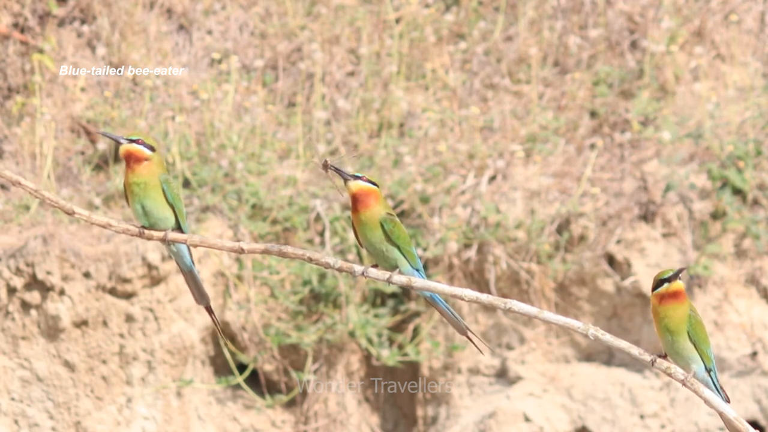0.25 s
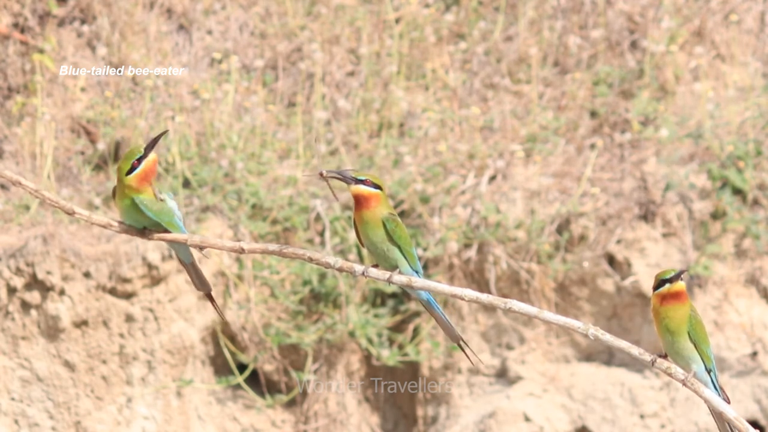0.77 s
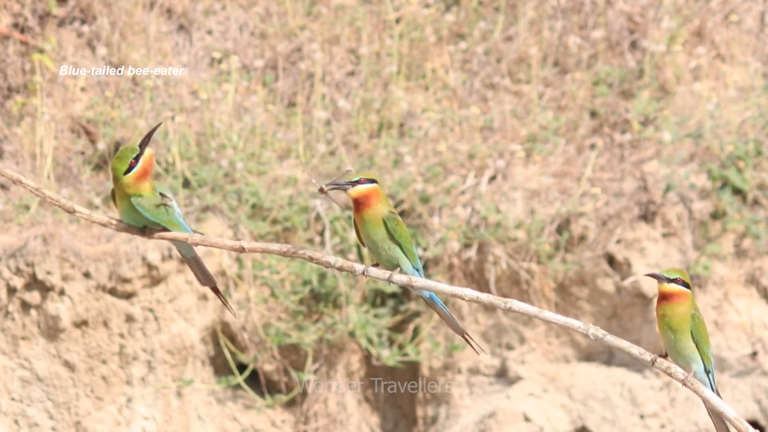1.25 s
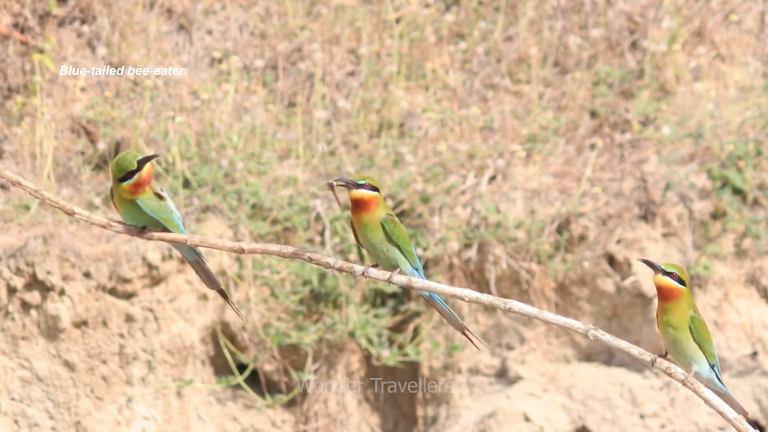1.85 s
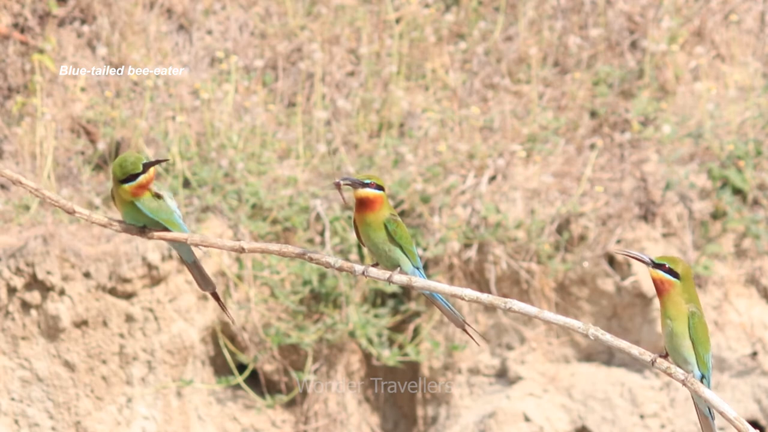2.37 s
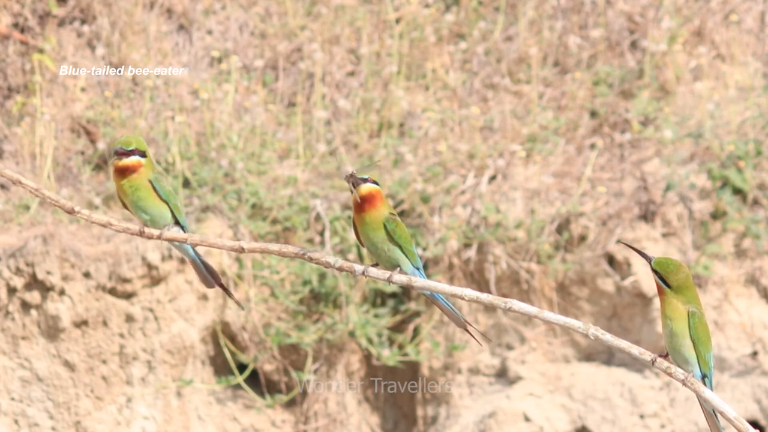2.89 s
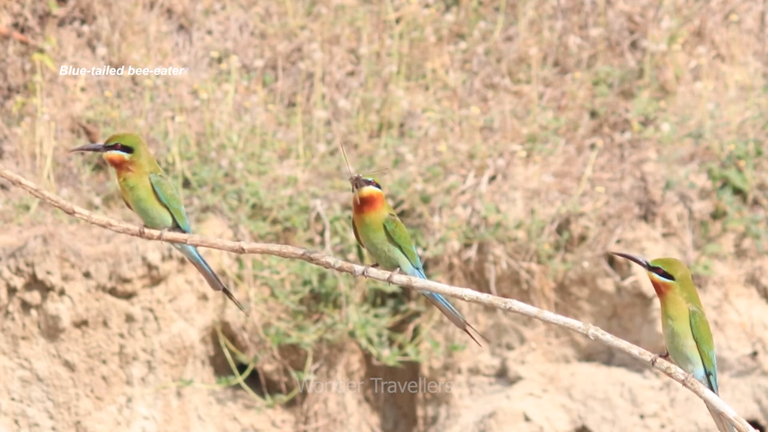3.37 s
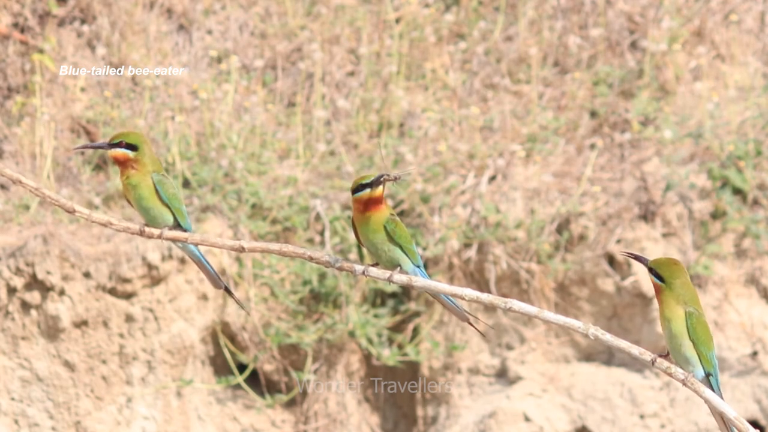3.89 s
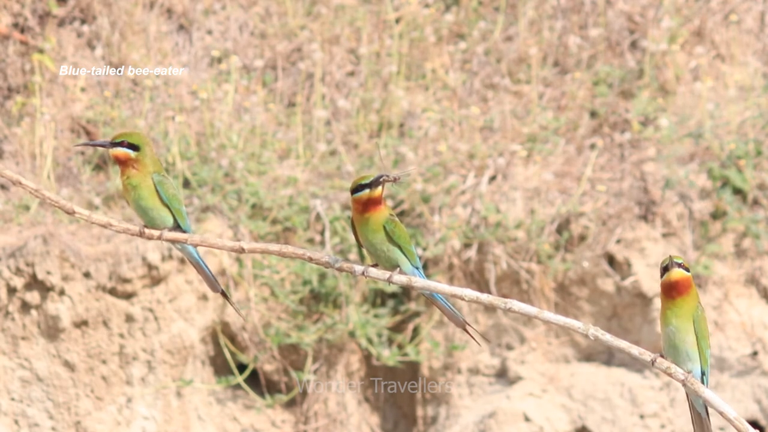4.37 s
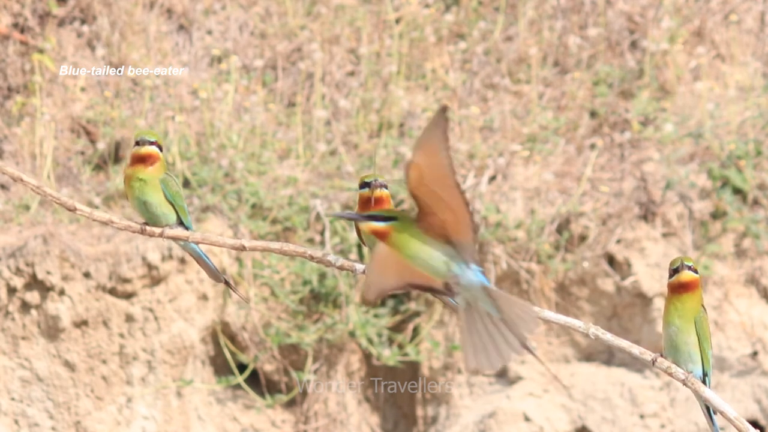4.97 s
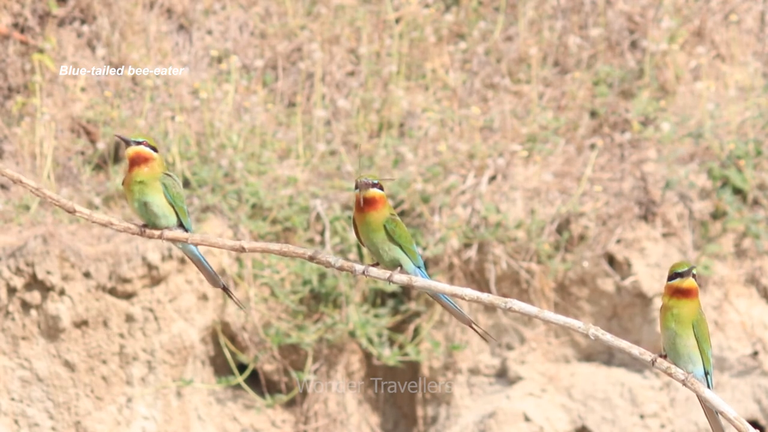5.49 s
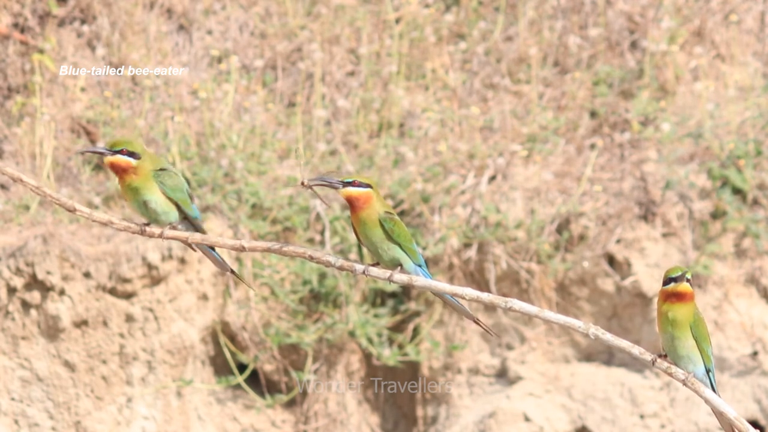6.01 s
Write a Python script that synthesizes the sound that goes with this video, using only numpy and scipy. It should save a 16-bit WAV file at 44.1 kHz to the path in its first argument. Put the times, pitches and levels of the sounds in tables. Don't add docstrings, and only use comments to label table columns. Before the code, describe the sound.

Open air outdoors, in stereo, with soft hiss, a low distant engine hum, a barely audible very high whine and a far bird colony chirping faintly. Wind thumps the microphone at 0 s and quickly dies down. A camera fires a quick pair of clacks at 0.3-0.4 s, a louder close shutter snaps at 0.77, another pair follows at 1.0-1.1, and the close one again at 1.47. A bee-eater starts with a stuttering call at 1.44, then rolls through liquid trills from 1.7 to 4.5, slightly right, with four rising chirps at 2.3-2.6. A second, reedier bird replies at 1.9 and 3.1. Five faint metallic ticks come evenly from 2.0 to 3.0; a dove purrs low around 2-3.2. Three rapid clacks overlap the trill's end at 4.4-4.6, then two loud ones at 4.7-4.8. Wind shifts side to side from 4.9 over distant chirps; a final loud shutter clacks at 6.2.

```python
import sys
import numpy as np
from scipy import signal
from scipy.fft import rfft, irfft
from scipy.io import wavfile
from scipy.ndimage import uniform_filter1d

SR = 44100
rng = np.random.default_rng(int(sys.argv[2]) if len(sys.argv) > 2 else 0)


def generate_wav(signal):
    frames = np.transpose(np.atleast_2d(signal))
    scaled = np.clip(frames, -1, 1) * 32767
    pcm = np.round(scaled).astype(np.int16)
    wavfile.write(sys.argv[1], SR, pcm)


def undo_db(level):
    steps = np.asarray(level, float) / 20
    return 10 ** steps


N = 275184

# pitch_hz at start, middle, end
HICCUP_HZ = (1900, 1865, 1820)
# pitch_hz, width_hz, level_db
CLACK = [(1250, 260, 0), (1550, 300, -8), (2200, 450, -6), (3300, 700, -8), (4450, 700, -9),
         (6100, 900, -13)]


def evened(x):
    return x / np.sqrt(np.mean(x ** 2) + 1e-20)


def smoothed_noise(size):
    return evened(uniform_filter1d(rng.standard_normal(N), size=size))


def read(points, hz):
    f, value = np.transpose(points)
    return np.interp(np.log(hz + 1), np.log(f + 1), value)


def tinted(x, colour):
    curve = np.log(undo_db(read(colour, np.fft.rfftfreq(512, 1 / SR))))
    fold = np.r_[1, np.full(255, 2), 1, np.zeros(255)]
    taps = irfft(np.exp(rfft(irfft(curve) * fold)))
    return signal.oaconvolve(x, taps / np.linalg.norm(taps))[:len(x)]


def body(x, modes):
    out = 0
    for k, (hz, width, db) in enumerate(modes):
        ring = signal.lfilter(*signal.iirpeak(hz, hz / width, SR), x)
        out = out + (-1) ** k * undo_db(db) * ring
    return out


def placed(x, pan_db, lag):
    cycles = np.fft.rfftfreq(len(x))
    side_db = read(pan_db, cycles * SR) if np.ndim(pan_db) else pan_db
    side = undo_db(side_db / 2)
    left = side * np.exp(-2j * np.pi * cycles * lag)
    right = 1 / side + 0 * cycles
    return irfft(rfft(x) * np.array([left, right]), len(x))


def bank(x, t60, wet_db):
    t = np.arange(SR // 3) / SR
    tail = rng.standard_normal((2, len(t))) * undo_db(-60 * t / t60) * (t > .004)
    echoes = signal.fftconvolve(x[None], tail / np.linalg.norm(tail[0]), axes=1)
    return undo_db(wet_db) * echoes[:, :N]


def noise(colour, size, patchy_db, same, lag):
    frames, hz = 4 * N // size + 5, np.fft.rfftfreq(size, 1 / SR)
    a, b, c, d, patches = rng.standard_normal((frames, len(hz), 5)).T
    patches = evened(uniform_filter1d(uniform_filter1d(patches, size=9, axis=0), size=7, axis=1))
    same = np.clip(read(same, hz), 0, 1)[:, None]
    right = a + 1j * b
    late = np.exp(-2j * np.pi * hz * lag / SR)[:, None]
    left = same * right * late + np.sqrt(1 - same ** 2) * (c + 1j * d)
    spectrum = np.array([left, right]) * undo_db(read(colour, hz)[:, None] + patchy_db * patches)
    return evened(signal.istft(spectrum, nperseg=size, noverlap=3 * size // 4)[1][:, :N])


def whine():
    return undo_db(-76.5) * np.sin(2 * np.pi * 15708 * np.arange(N) / SR)


def open_air():
    # pitch_hz, level_db per Hz
    air_colour = [(120, -33), (200, -2.5), (244, -8.5), (683, -14.5), (880, -20), (1040, -16.5),
                  (2210, -13), (3010, -17), (4640, -31), (10300, -31.5), (12500, -38), (15000, -36)]
    # pitch_hz, likeness from 0 to 1
    air_alike = [(700, .4), (2500, .75), (3600, .5), (4800, .1)]
    return undo_db(-53.5) * noise(air_colour, 512, 1.7, air_alike, 8.7) * undo_db(np.array([[-1.2], [1.2]]))


def drone():
    # pitch_hz, width_hz, level_db
    hums = [(121.4, 19, 0.0071), (193.5, 30, -0.26), (96.9, 29, 0.97)]
    rumble = body(body(rng.standard_normal(N), hums), hums)
    return placed(undo_db(-52) * evened(rumble), 0.38, 1.2)


def whistle(ms, start_hz, end_hz, arch_hz):
    u = np.linspace(0, 1, int(ms * SR / 1000))
    hz = start_hz + (end_hz - start_hz) * u + arch_hz * np.sin(np.pi * u)
    return np.sqrt(2) * np.sin(2 * np.pi * np.cumsum(hz) / SR) * signal.windows.tukey(len(u), .6)


def colony():
    # start_s, length_ms, first_pitch_hz, last_pitch_hz, level_db
    glides = [(.124, 14, 2600, 3100, -47), (.362, 18, 2750, 3250, -47), (.535, 16, 3000, 3450, -58),
              (.934, 17, 2650, 3400, -54), (2.64, 25, 2350, 2750, -52), (4.14, 22, 2600, 2900, -52),
              (5.21, 18, 3050, 3250, -55), (5.115, 22, 3000, 3150, -56), (5.955, 25, 1950, 1950, -57),
              (5.465, 12, 3800, 3650, -61), (5.652, 14, 3800, 3700, -58), (5.76, 35, 2150, 2050, -58),
              (3.815, 32, 1230, 930, -55), (5.325, 50, 2800, 2050, -58), (5.14, 40, 3300, 3400, -59),
              (5.93, 40, 3100, 3050, -60), (.145, 14, 3100, 3700, -58), (.378, 12, 3200, 3600, -54)]
    # start_s, level_db
    arches = [(5.503, -55.5), (5.672, -56), (5.864, -53.5), (6.092, -59), (5.0, -62), (5.315, -63)]
    # start_s, level_db
    rises = [(.135, -54), (.294, -52), (0.369, -50.5), (.516, -52), (0.566, -55), (0.663, -52),
             (5.723, -51), (5.132, -54), (5.197, -53), (5.411, -55), (5.577, -55), (5.787, -58),
             (5.879, -54), (5.948, -55), (.022, -57), (1.126, -57)]
    # start_s, length_ms, pitch_hz at both ends, level_db
    humps = [(.225, 35, 2350, -54), (.882, 28, 2150, -53), (1.065, 30, 2350, -55), (1.59, 48, 2280, -53),
             (1.856, 40, 2330, -48.5), (2.286, 42, 2150, -48), (2.694, 55, 2400, -49),
             (3.395, 35, 2450, -48), (3.867, 35, 2150, -47), (3.902, 41, 2400, -48), (4.53, 30, 2130, -49),
             (4.92, 40, 2750, -51), (4.96, 30, 2330, -57), (5.342, 26, 2900, -57), (6.058, 22, 2130, -55)]
    # start_s, length_ms, pitch_hz at both ends, level_db
    left_humps = [(.475, 35, 2050, -54), (5.4, 48, 2150, -52), (5.828, 46, 2200, -54),
                  (4.953, 24, 2150, -56)]
    hump_hz = 220
    # start_s, length_ms, first_pitch_hz, last_pitch_hz, level_db, arch_hz
    calls = [(a * N / SR, 12 + 30 * b, 1900 + 1250 * c, 2000 + 1250 * d, -68 + 6 * e, 150)
             for a, b, c, d, e in rng.random((700, 5))]
    calls += [(*row, 60) for row in glides]
    calls += [(s, 62, 2400, 2350, db, 740) for s, db in arches]
    calls += [(s, ms, hz, hz, db, hump_hz) for s, ms, hz, db in humps]
    calls += [(s, 23, 2150, 3250, db, -60) for s, db in rises]
    left_calls = [(s, ms, hz, hz, db, hump_hz) for s, ms, hz, db in left_humps]
    out = np.zeros((2, N + SR))
    for group, usual_pan_db in [(calls, -6), (left_calls, 8)]:
        for s, ms, start_hz, end_hz, db, arch_hz in group:
            pan_db = rng.normal(usual_pan_db, 1.4)
            note = undo_db(db) * whistle(ms, start_hz, end_hz, arch_hz)
            for port, (late, side) in enumerate([(8, .5), (0, -.5)]):
                at = round(s * SR) + late
                out[port, at:at + len(note)] += note * undo_db(side * pan_db)
    return out[:, :N] + bank(out[1, :N], .14, -11)


def dove():
    # time_s, pitch_hz, level_db
    coos = [
        [(1.949, 656, -79), (2.15, 640, -64.5), (2.501, 649.5, -64), (2.6, 594, -84)],
        [(2.711, 516.5, -67), (2.765, 635, -59), (2.81, 760, -56.5), (2.951, 727, -55), (3.14, 686, -54),
         (3.2, 670, -60), (3.26, 648, -69)],
    ]
    s, hz, db = np.concatenate(coos).T
    t = np.arange(N) / SR
    purr = 1 + .8 * np.sin(2 * np.pi * 36.5 * t + 2.4 + .4 * smoothed_noise(2000))
    tone = np.sin(2 * np.pi * np.cumsum(np.interp(t, s, hz)) / SR)
    coo = undo_db(np.interp(t, s, db, -120, -120)) * purr * tone
    return placed(coo, -1.3, 4.5) + bank(coo, 0.3, -11)


def wind():
    # time_s, level_db, left_right_db
    strength = [
        (0.0, -33.5, -1),
        (0.14, -53.5, -4),
        (1.49, -57.5, -0.5),
        (4.81, -54, -1),
        (4.9, -49.5, 16),
        (5.2, -46.5, -14),
        (5.45, -51, -5),
        (5.61, -54, 8),
        (6.24, -45.5, -8.5),
    ]
    # pitch_hz, level_db per Hz
    wind_colour = [(8.8, -43), (15, -53), (43, 1), (97, -1), (269, -19.5), (314, -21), (408, -47),
                   (506, -25.5), (600, -41), (780, -61), (1320, -120)]
    # time_s, peak_db, width_ms, port (0 left, 1 right)
    buffets = [(.0051, -14, 1.05, 1), (.014, -19.5, .59, 1), (.0251, -30, 2.7, 1), (.0728, -23, 1.03, 0),
               (.7607, -24.5, 1.57, 0), (3.8118, -25.5, 2.8, 0), (4.917, -29.5, .92, 0),
               (4.9246, -18.5, 1.46, 0), (5.0975, -21.5, 2.5, 0), (5.103, -38, 5, 1),
               (5.1872, -28.5, 1.55, 1), (5.5353, -24.5, 3.1, 0)]
    s, db, pan_db = np.transpose(strength)
    t = np.arange(N) / SR
    level_db = np.interp(t, s, db) + np.array([[.5], [-.5]]) * np.interp(t, s, pan_db)
    lumps = uniform_filter1d(rng.standard_normal((2, N)), size=900)
    lumps = evened(uniform_filter1d(lumps, size=900))
    turbulence = noise(wind_colour, 2048, 1.5, [(40, .55), (150, .8), (300, .75)], 0)
    out = undo_db(level_db + 1.5 + 4.5 * lumps) * turbulence
    for s, db, ms, port in buffets:
        u = (t - s) / ms * 1000
        out[int(port > .5)] -= undo_db(db) * (1 - u ** 2) * np.exp(-np.minimum(u ** 2 / 2, 50))
    return out


def ringing(shots, rings):
    out = np.zeros(N + SR)
    for s, db in shots:
        for ms, length, hz, ring_db in rings:
            t = np.arange(int(length * 2 * SR / 1000)) / SR
            gate = np.minimum(t / .0005, 1) * np.exp(-1.5 * (1000 * t / length) ** 3)
            tone = np.sin(2 * np.pi * hz * rng.normal(1, .012) * t)
            at = round((s + ms / 1000) * SR)
            out[at:at + len(t)] += undo_db(db + ring_db + rng.normal(0, 1)) * gate * tone
    return out[:N]


def camera(shots, steps, strengths, clack_modes, tick_colour, pan_db, tick_pan_db, lag, alike, rings=()):
    # pitch_hz, width_hz, level_db
    thud_modes = [(400, 90, 0), (600, 220, 0), (800, 240, -3)]
    lead = 2600
    t = np.arange(-lead, lead + 400) / SR * 1000
    out = np.zeros((3, N + SR))
    habit = rng.standard_normal((3, len(t)))
    grain = evened(uniform_filter1d(rng.standard_normal(len(t)), size=30))
    grain = evened(undo_db(1.8 * grain))
    for s, db in shots:
        knocks = alike * habit + (1 - alike) * rng.standard_normal(habit.shape)
        knocks = knocks * grain / np.hypot(alike, 1 - alike)
        drive = np.zeros(habit.shape)
        for (ms, length), parts_db in zip(steps, strengths):
            u = np.maximum(t - ms, 0) / length
            rise = np.minimum((5 if length < 13 else 2) * u, 1)
            gate = rise * np.exp(-u ** 2 * 1.5)
            strike = 4.5 * (length < 5) * np.diff(1. * (t >= ms), prepend=0)
            hits = gate * knocks + strike * np.array([[1.], [1.], [.35]])
            drive += undo_db(np.array(parts_db))[:, None] * hits
        at = round(s * SR) - lead
        out[:, at:at + len(t)] += undo_db(db) * drive
    thud = body(out[0, :N], thud_modes) / np.std(body(habit[0], thud_modes))
    clack = body(out[1, :N], clack_modes) / np.std(body(habit[0], clack_modes))
    knock = thud + ringing(shots, rings) + clack
    tick = tinted(out[2, :N], tick_colour)
    direct = placed(knock, pan_db, lag) + placed(tick, tick_pan_db, lag + 2)
    return direct + bank(knock + .45 * tick, 0.06, -12)


def far_camera():
    # slap_s, level_db
    shots = [
        (2.0046, 0.014),
        (2.2511, 0),
        (2.4975, 0.0018),
        (2.744, 0.0031),
        (2.9919, 0.001),
    ]
    # press_s, level_db
    presses = [
        (1.9168, 0.5),
        (2.163, -3),
        (2.409, -7),
        (2.656, -7),
        (2.904, -6),
    ]
    # time_ms from the slap, length_ms
    steps = [
        (-41, 2),
        (-24.2, 3),
        (-.3, 3),
        (8, 16),
        (19, 12),
        (33, 4),
        (40, 6),
    ]
    # thud_db, clack_db, tick_db
    strengths = [(-73, -68, -49.5), (-78, -61, -46.5), (-77, -63, -46), (-76, -70, -50.5), (-76, -70, -55),
                 (-73, -64, -50), (-82, -76, -54)]
    # pitch_hz, level_db
    tick_colour = [(3500, 0), (5000, -5), (9000, -0.5), (12000, -3), (13000, -6), (15000, -14)]
    # pitch_hz, left_right_db
    shade = [(5000, -8), (9000, -9), (11800, -17), (14000, -15)]
    out = camera(shots, steps, strengths, CLACK, tick_colour, 0.9, shade, 5.8, 0.39)
    return out + camera(presses, steps[2:3], strengths[2:3], CLACK, tick_colour, -4, shade, 12, .6)


def burst_camera():
    # slap_s, level_db
    shots = [
        (.2978, 0.012),
        (.3971, 0),
        (1.0052, 0),
        (1.105, 0),
        (4.4352, 0.011),
        (4.534, 0.0049),
        (4.6337, 0.016),
    ]
    # time_ms from the slap, length_ms
    steps = [
        (-47, 3),
        (-38.7, 3),
        (-33, 5),
        (-20.7, 3),
        (-12, 2),
        (-.3, 4),
        (6, 8),
        (13, 20),
        (31, 6),
    ]
    # thud_db, clack_db, tick_db
    strengths = [(-75, -57, -62), (-76, -66, -43), (-56.5, -48.5, -58.5), (-51, -43, -45), (-72, -54, -63),
                 (-54, -39.5, -46), (-56, -72, -65), (-57, -48.5, -56.5), (-61, -49, -60)]
    # pitch_hz, width_hz, level_db
    clack_modes = [(1250, 260, 1), (1610, 300, 1), (2180, 550, -6), (3300, 630, -4), (4430, 600, -6),
                   (6300, 900, -37)]
    # pitch_hz, level_db
    tick_colour = [(4500, -12), (6200, -4.5), (7400, 6), (8300, -3.5), (9200, -8), (12000, -12.5),
                   (14000, -13), (16000, -22)]
    # pitch_hz, left_right_db
    shade = [(5500, -4), (7000, -7), (8000, -14), (9200, -5), (12000, -7), (14000, -4)]
    # time_ms from the slap, length_ms, pitch_hz, level_db
    rings = [
        (-21.5, 6.1, 660, -46),
        (-18, 3.2, 1150, -43),
        (-1.5, 7.1, 785, -45.5),
        (-0.3, 2.2, 1145, -39.5),
        (0, 3.3, 1540, -39),
    ]
    return camera(shots, steps, strengths, clack_modes, tick_colour, -3.5, shade, 6.5, 0.32, rings)


def near_camera():
    # slap_s, level_db
    shots = [
        (.7688, 4),
        (1.4732, 3.5),
        (4.6991, 4),
        (4.8044, 4),
        (6.1887, 4),
    ]
    # time_ms from the slap, length_ms
    steps = [
        (-50.5, 2),
        (-42.3, 1.5),
        (-39, 9),
        (-25, 4),
        (-.5, 4.5),
        (4, 12),
        (14, 12),
        (23, 11),
        (31, 4),
        (37, 4),
    ]
    # thud_db, clack_db, tick_db
    strengths = [(-70, -65, -44), (-57, -48, -32), (-57, -52, -49), (-52, -45, -37), (-52, -40, -34),
                 (-56, -55, -53), (-56, -50, -50), (-54, -50, -50), (-54, -46, -44), (-57, -51, -43)]
    # pitch_hz, level_db
    tick_colour = [(4000, -9), (6000, -4), (7200, 4.5), (9000, -5.5), (12000, -12.5), (14000, -20.5),
                   (16000, -22)]
    # pitch_hz, left_right_db
    shade = [(5500, 0), (7000, -5), (8200, -14), (9200, -12), (10200, -8), (11600, 0)]
    # time_ms from the slap, length_ms, pitch_hz, level_db
    rings = [
        (-22, 3.4, 680, -36),
        (-25, 2.5, 1350, -38),
        (-20, 2.6, 1870, -40),
        (-1.45, 6.7, 1194, -34),
        (0.5, 3.3, 1473, -33.5),
        (0.8, 4.8, 2170, -38),
        (2.5, 8.8, 570, -41.5),
        (-1, 7.4, 3900, -54),
        (24.5, 17.6, 380.6, -44.5),
    ]
    return camera(shots, steps, strengths, CLACK, tick_colour, 0.89, shade, 1.14, .65, rings)


def sung(shape, rows):
    notes, total = [], sum(stroke[0] for stroke in shape)
    for s, ms, pitch, db in rows:
        for length, *rest in shape:
            length = length * ms / total
            if rest:
                hz = [pitch * f for f in rest[:-1]] or HICCUP_HZ
                notes.append((s, length, *hz, db + rest[-1]))
            s += length / 1000
    return notes


def bird(notes, tones, gain_db, db_per_khz, edge_ms, waver_db, swell_db, low_db=0, facing_db=0,
         bright_db_per_khz=0):
    beak_hz, beak_width_hz = 12200, 1500
    out, edge = np.zeros(N), int(edge_ms * SR / 1000)
    waver = undo_db(waver_db * smoothed_noise(90))
    for hiccups in (False, True):
        hz, level = np.zeros(N), np.zeros(N)
        hz[0] = HICCUP_HZ[0]
        half = sorted(n for n in notes if (n[2] == HICCUP_HZ[0]) == hiccups)
        for s, ms, start_hz, mid_hz, end_hz, db in half:
            span = slice(round(s * SR), round((s + ms / 1000) * SR) + 4)
            u = np.linspace(-1, 1, span.stop - span.start)
            bend_hz = (start_hz + end_hz) / 2 - mid_hz
            hz[span] = mid_hz + (end_hz - start_hz) / 2 * u + bend_hz * u ** 2
            tilt_db = db_per_khz * (hz[span] - hz[span].mean()) / 1000
            level[span] = undo_db(db + gain_db - swell_db * u ** 2 + tilt_db)
        sounding = np.flatnonzero(hz)
        hz = np.interp(np.arange(N), sounding, hz[sounding])
        level = waver * uniform_filter1d(uniform_filter1d(level, edge), edge)
        turns = 2 * np.pi * np.cumsum(uniform_filter1d(hz, size=20)) / SR
        octave_db = low_db * uniform_filter1d(1. * (hz < 1950), size=40)
        for k, db in tones:
            beak_db = facing_db * np.exp(-((k * hz - beak_hz) / beak_width_hz) ** 2)
            bright_db = bright_db_per_khz * (k > 2) * (hz - 3000) / 1000
            tone_db = db + beak_db + bright_db + octave_db * (k == 2)
            out += np.sqrt(2) * level * undo_db(tone_db) * np.sin(k * turns)
    return out


def answering_bird():
    # multiple of the pitch, level_db
    answer_tones = [
        [(1, 0), (2, -14), (3, -27), (4, -17), (5, -33), (6, -34)],
        [(1, 0), (2, -19), (3, -27), (4, -31), (5, -46), (6, -40)],
    ]
    # length_ms, start_hz, middle_hz, end_hz, level_db
    openings = [
        [(26, 2090, 2340, 2600, -4.5), (4, 2520, 2680, 2850, 3.5)],
        [(25.9, 2200, 2410, 2520, -3.5), (4.004, 2470, 2800, 2900, -3)],
    ]
    # strokes as above; length_ms, level_db = hiccup; length_ms alone = rest
    reply = [
        (6.3, -9.5),
        (16.5, 2936, 2523, 2200, -0.5),
        (12.5, 2200, 1948, 1820, -16.5),
        (5.94,),
        (4.5, 2120, 2200, 2400, -10),
        (19.5, 2540, 2449, 2322, -2),
        (1.6,),
        (15.5, 2750, 2680, 2700, 1.3),
        (6.05, -16),
        (18, 2830, 2603, 2150, -1.5),
    ]
    # start_s, length_ms, pitch_factor, level_db
    replied = [
        (1.9175, 135.6, .97, -40),
        (3.1141, 137.5, 1.01, -36),
    ]
    song = 0
    for row, opening, tones in zip(replied, openings, answer_tones):
        song = song + bird(sung(opening + reply, [row]), tones, -2.9, 15, 0.37, 0.93, 0.3, low_db=19)
    return placed(song, -5.0, 18.2) + bank(song, 0.12, -15.5)


def trilling_bird():
    # length_ms, start_hz, middle_hz, end_hz, level_db;
    # length_ms, level_db = low hiccup; length_ms alone = rest
    quick_arch = [
        (15, 2230, 2480, 2572, -2),
        (12.5, 2570, 2450, 2200, 0),
        (8, 2197, 2450, 2804, -2.5),
        (6.53, -3),
    ]
    arch = [
        (23.5, 2132, 2601.5, 2736, -2),
        (14, 2737, 2639, 2397, 0),
        (6.95, 2400, 2560, 2900, 0.42),
        (9, -3.5),
    ]
    fall = [
        (18.5, 3020.5, 2879.5, 2344, 1.1),
        (6, 2347, 2118.5, 1899.5, -5.5),
        (2.4,),
        (6.5, 2100, 2369, 2717, -5.5),
        (3.3, -4),
    ]
    roll = [
        (18.83, 2900, 2768.5, 2150, 0.4),
        (3.2, -20),
        (14, 2620, 2851.5, 2880, 1.4),
        (5.7, -3),
        (5.9, 2990, 3020.5, 2900, 2.2),
        (8.1, -3),
    ]
    broken_end = [
        (7, 2956.5, 2931, 2677, -0.5),
        (4.9, -11),
        (8.5, 2732, 2357.5, 1958, -3),
        (6.5, 1958, 1798, 1601, -12),
    ]
    smooth_end = [
        (12.9, 2980, 2640, 1500, 1.5),
        (10, 1600, 2000, 1500, -18),
    ]
    stutter = [
        (18, 2380, 2660, 2820, -7),
        (4,),
        (9, 3200, 2960, 3150, -1.5),
        (2,),
        (16, 1980, 2120, 1900, -4),
        (14, 3342, 2850, 2450, -3),
        (2.6,),
        (8, 2850, 2559, 2380, -4),
        (3.3,),
        (6.5, 2400, 2206, 2050, -7),
    ]
    chirp = [
        (26.5, 2070, 2810, 3040, 1),
        (14.5, 1880, 2030, 1800, -9),
    ]
    # start_s, length_ms, pitch_factor, level_db
    quick_arched = [
        (1.6945, 42.44, 1.001, -37.5),
    ]
    arched = [(2.031, 47.9, 0.96, -36), (2.8005, 50, .99, -34.5), (3.2278, 48.4, 1, -34.5),
              (3.5863, 48.7, 1, -34.5), (3.962, 51.3, 1.015, -37.5), (4.365, 48, 0.99, -37.5)]
    fallen = [(1.738, 34.34, 0.99, -39), (2.0783, 37.2, 0.98, -37.5), (2.8535, 37.5, 1.001, -36),
              (3.2763, 37.44, 1, -37), (3.636, 37.7, 1.005, -36.5), (4.013, 36.4, 0.99, -37),
              (4.412, 40, 0.97, -38.5)]
    rolled_broken = [(2.1167, 77.7, .98, -36), (3.3137, 77.5, 1.015, -36), (3.6738, 81.8, 0.99, -36.5),
                     (4.0499, 80.9, 1.002, -37), (4.4513, 82.5, 0.97, -37.5)]
    rolled_smooth = [
        (1.774, 73, .975, -38.5),
        (2.891, 77.4, 1.012, -36),
    ]
    stuttered = [
        (1.4372, 83.34, 1.001, -35.5),
    ]
    chirped = [
        (2.3266, 41.2, 0.98, -36.5),
        (2.393, 42.3, 1, -34.5),
        (2.474, 42.6, 1.003, -35),
        (2.5847, 44.5, 0.97, -35.5),
    ]
    # multiple of the pitch, level_db
    trill_tones = [(1, 0), (2, -30), (3, -40), (4, -42), (5, -47)]
    chirp_tones = [(1, 0), (2, -28), (3, -29), (4, -40), (5, -40)]
    # time_s, extra level_db of high overtones
    facing = [
        (1.9, 0),
        (2.05, 8),
        (2.35, 7),
        (2.4, 0),
        (4.2, 0),
        (4.35, 19),
    ]
    # pitch_hz, left_right_db
    perch_side = [(1900, -2.5), (2400, -7), (3000, -7)]
    trills = sung(quick_arch, quick_arched) + sung(arch, arched) + sung(fall, fallen)
    trills += sung(roll + broken_end, rolled_broken) + sung(roll + smooth_end, rolled_smooth)
    trills += sung(stutter, stuttered)
    facing_db = np.interp(np.arange(N) / SR, *np.transpose(facing))
    song = bird(trills, trill_tones, -1.2, 3.2, 0.48, 1.0, 2.0, facing_db=facing_db)
    song += bird(sung(chirp, chirped), chirp_tones, -0.5, 0.92, 2.0, 0.86, 5.4,
                 facing_db=facing_db, bright_db_per_khz=16)
    return placed(song, perch_side, 15.74) + bank(song, 0.12, -15.5)


def scene():
    background = whine() + open_air() + drone() + colony() + dove()
    cameras = far_camera() + burst_camera() + near_camera()
    return background + wind() + cameras + answering_bird() + trilling_bird()


def top_cut(x):
    return signal.sosfilt(signal.butter(12, 16540, fs=SR, output="sos"), x)


def record(dry):
    low_pass = signal.firwin(511, 15950, window=("kaiser", 7), fs=SR)
    limited = signal.oaconvolve(dry, low_pass[None], "same")
    return top_cut(limited)


dry = scene()
out = record(dry)
generate_wav(out)
```